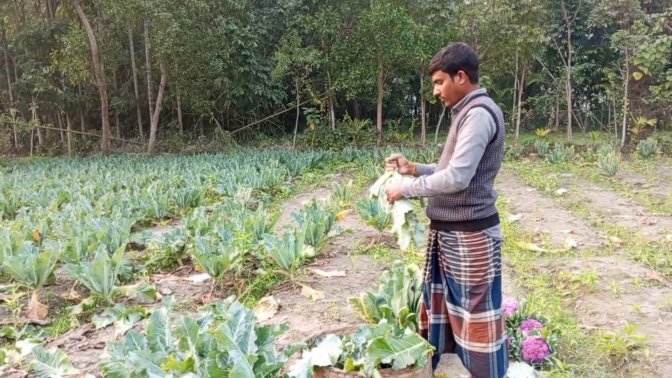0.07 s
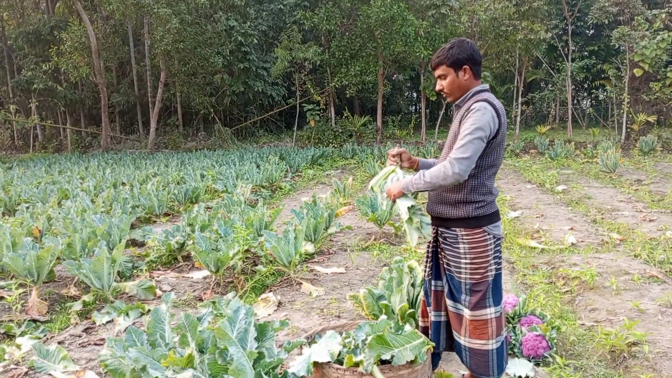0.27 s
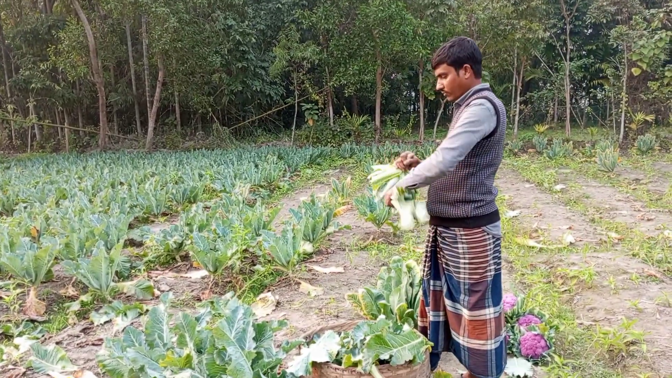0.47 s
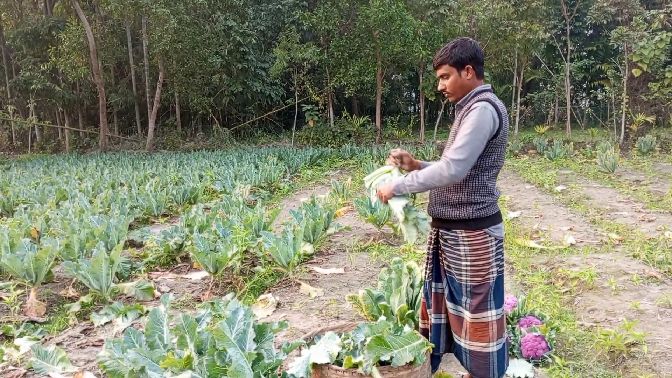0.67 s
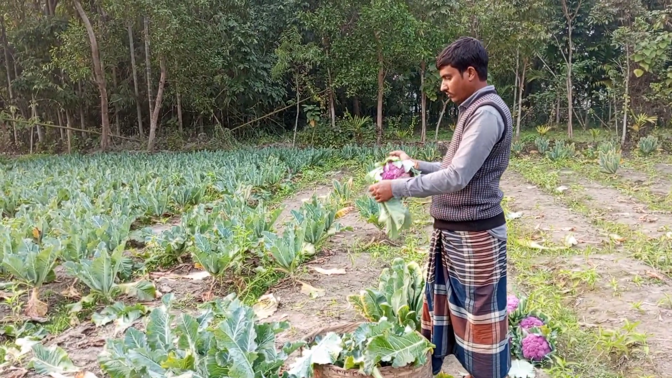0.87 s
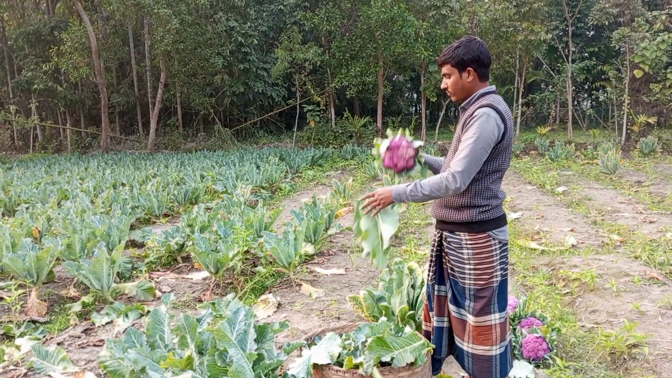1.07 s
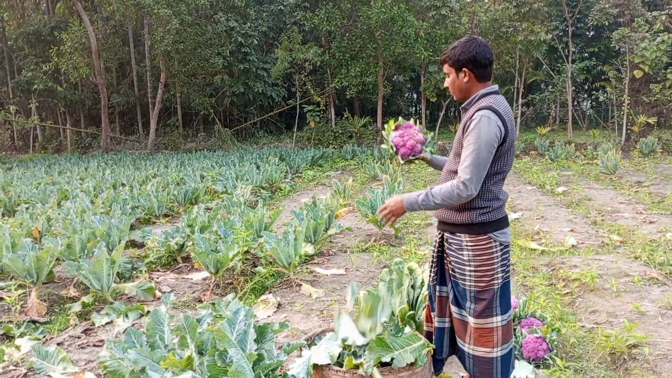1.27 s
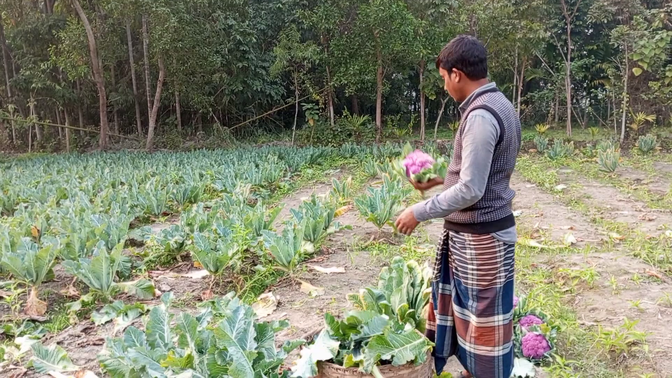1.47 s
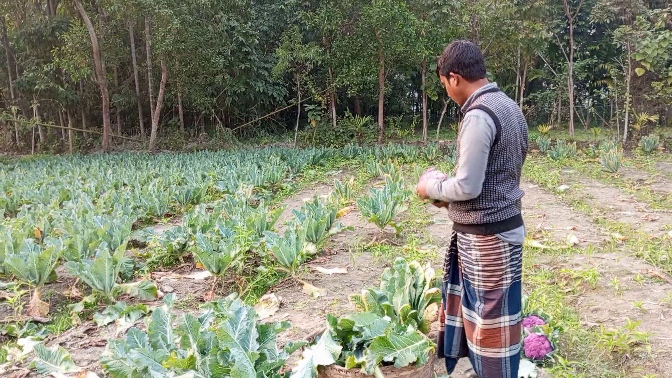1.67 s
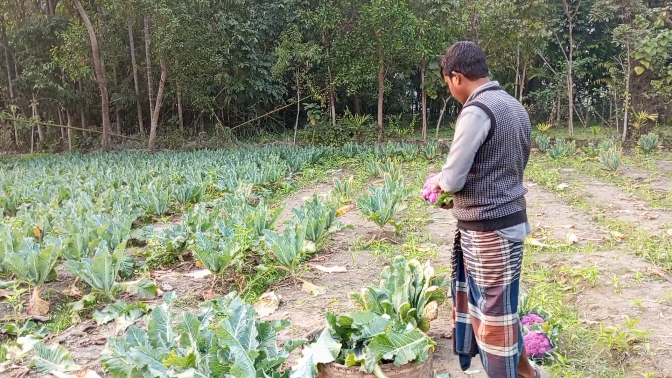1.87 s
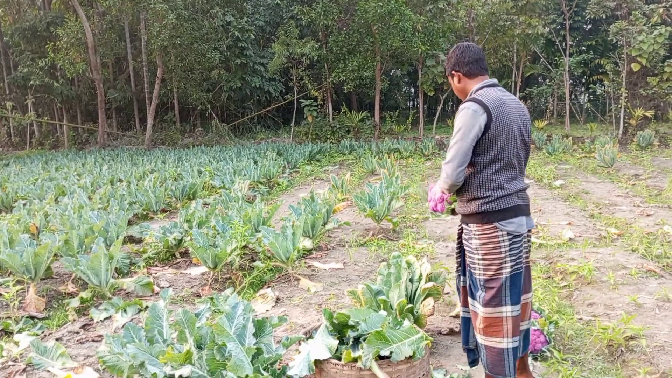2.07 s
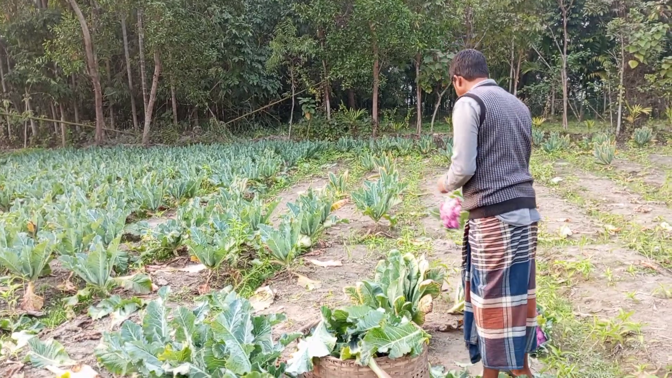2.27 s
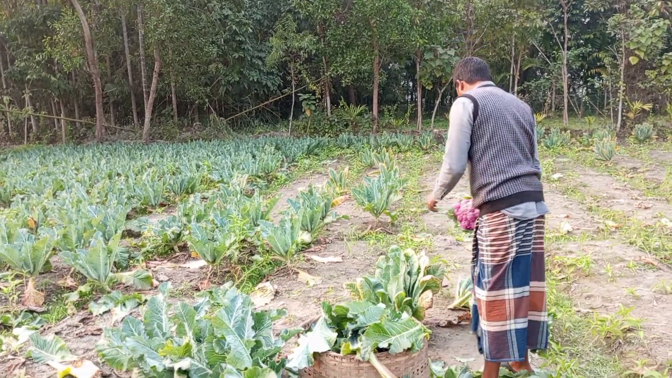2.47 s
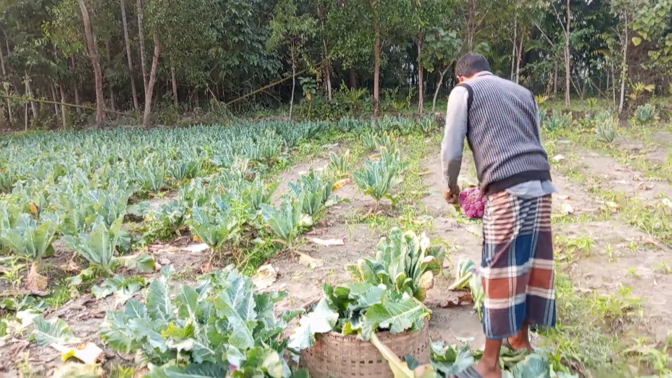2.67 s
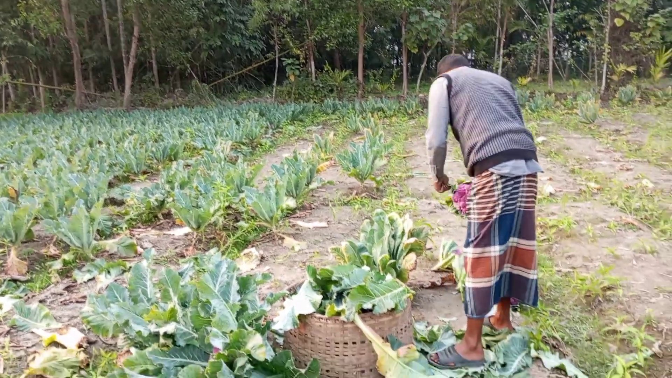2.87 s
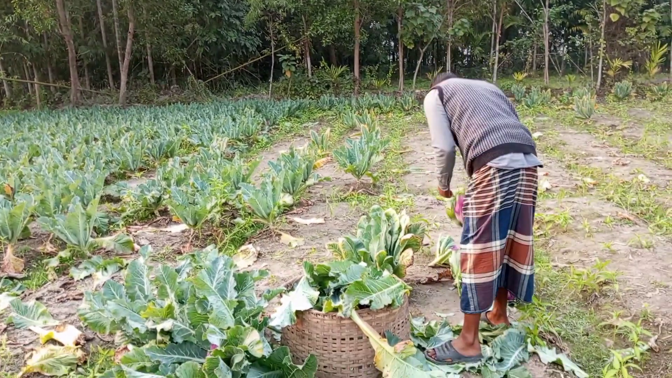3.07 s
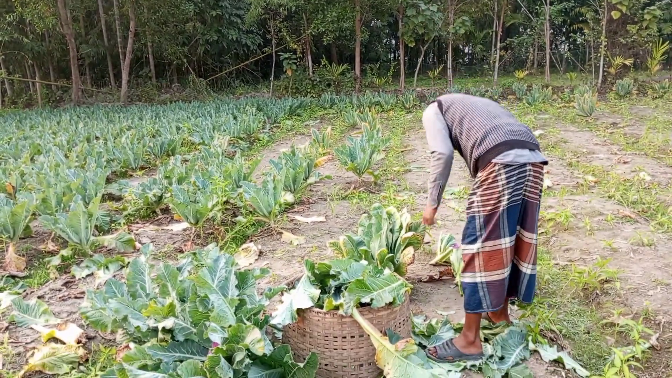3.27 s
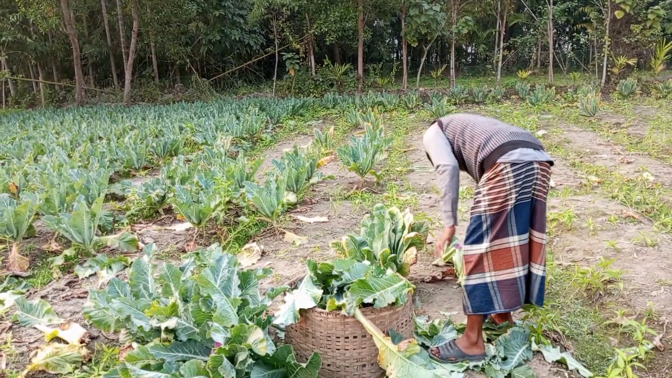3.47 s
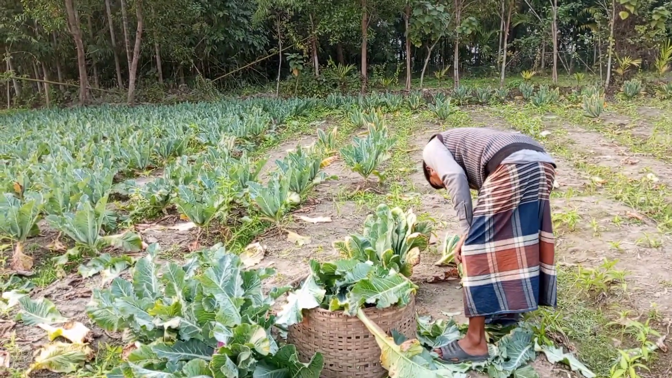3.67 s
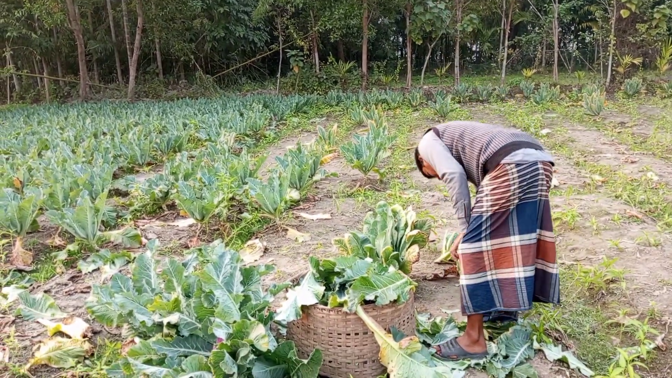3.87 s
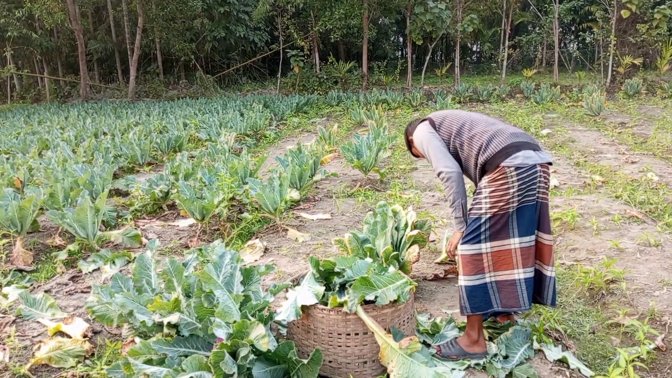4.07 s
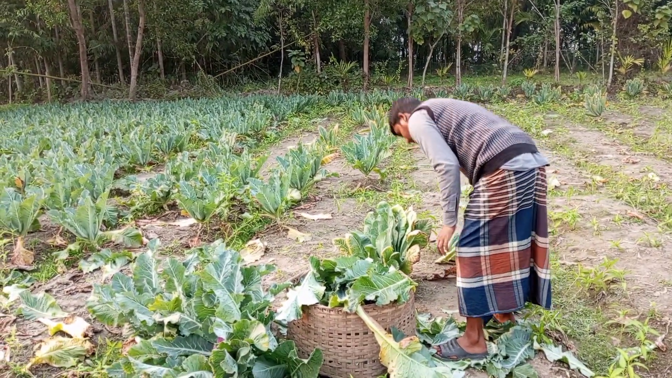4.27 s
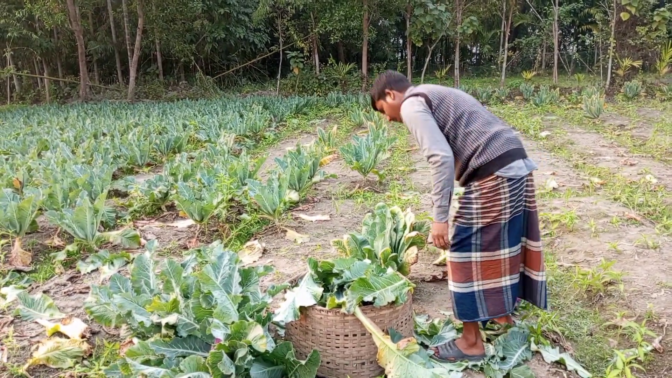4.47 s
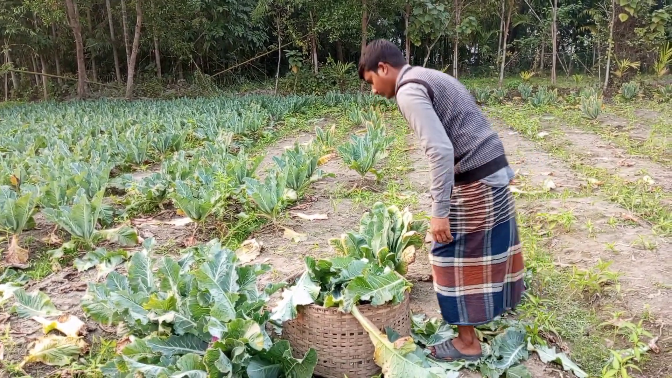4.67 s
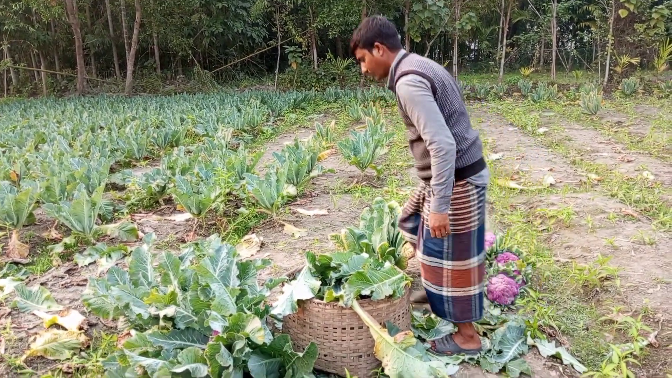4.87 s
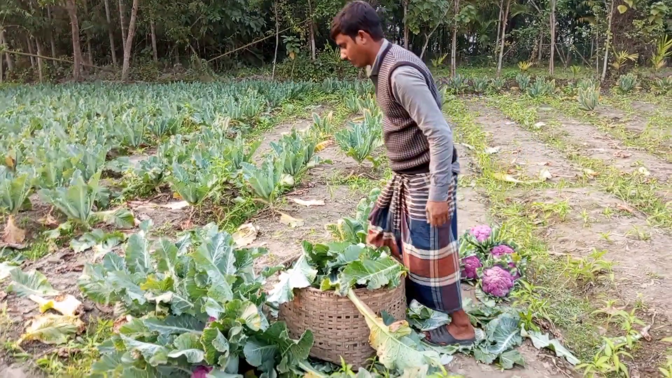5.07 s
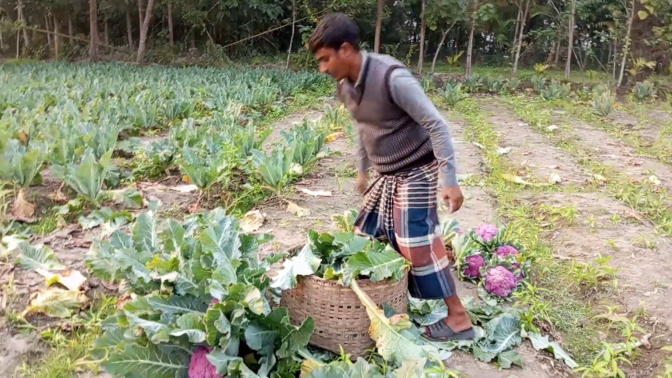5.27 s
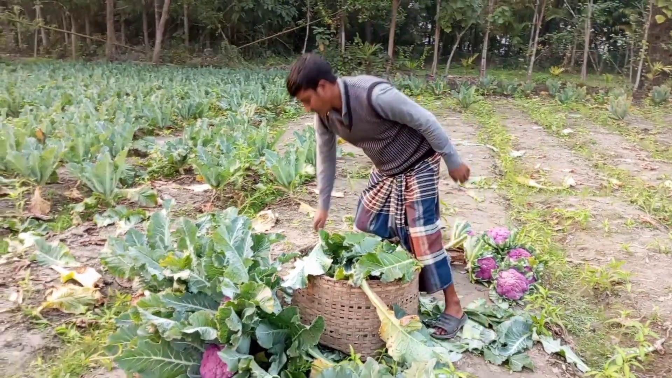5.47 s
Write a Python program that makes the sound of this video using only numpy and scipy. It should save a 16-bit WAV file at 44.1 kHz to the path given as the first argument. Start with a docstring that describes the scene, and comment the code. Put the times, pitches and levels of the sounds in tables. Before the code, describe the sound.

Close by, thick cauliflower leaves are snapped off by hand: dry cracks, two soft low pops and crackling rustle, strongest in the first half second. Handling then thins to small ticks and scuffs. A songbird's thin gliding whistle sounds early and returns halfway, with soft hoots far off in the trees. Near the end a foot crushes a crisp stalk. Open field beside a wood, light echo, faint hiss and low rumble.

```python
"""At the edge of a wood, hands snap leaves off a cauliflower: clicks of breaking fibres ring the stalk.
The leaves fold with two sagging pops and rustle as colored crackle; soles and leaves scuff in ringing grains.
A songbird's gliding whistle, heard early, returns halfway; far birds hoot on and off throughout.
Towards the end a sole crushes a crisp stalk. Field hiss and low rumble, both filtered noise, never stop."""
import sys
import numpy as np
from scipy import signal
from scipy.fft import rfft, irfft
from scipy.io import wavfile
from scipy.ndimage import uniform_filter1d

SR = 44100
rng = np.random.default_rng(int(sys.argv[2]) if len(sys.argv) > 2 else 0)


def master(y):
    """Save y as 16-bit WAV."""
    cut = np.clip(np.atleast_2d(y).T, -1, 1)
    pcm = np.round(cut * 32767)  # scale
    wavfile.write(sys.argv[1], SR, pcm.astype(np.int16))


N = 242991


def undb(db):
    """Decibels to gain."""
    return 10 ** (np.asarray(db) / 20)


def unit(x):
    """Scale to rms 1."""
    return x / np.sqrt(np.mean(x ** 2) + 1e-30)


def colour(x, points):
    """Shape a sound by (Hz, dB) points, joined over log frequency; rms 1."""
    hz, db = np.transpose(points)
    f = np.maximum(np.fft.rfftfreq(len(x), 1 / SR), 1)
    gain = undb(np.interp(np.log(f), np.log(hz), db))
    return unit(irfft(rfft(x) * gain, len(x)))


def band(x, lo_hz, hi_hz, order=3):
    """Causal band-pass."""
    edges_hz = [lo_hz, min(hi_hz, SR / 2 - 1)]
    return signal.sosfilt(signal.butter(order, edges_hz, "band", fs=SR, output="sos"), x)


def resonance(x, hz, width_hz):
    """One resonance, gain 1 at its centre."""
    return signal.lfilter(*signal.iirpeak(hz, hz / width_hz, SR), x)


def walk(rate_hz):
    """Smooth random wander, rms 1."""
    k = max(int(SR / rate_hz), 1)
    steps = np.repeat(rng.standard_normal(N // k + 1), k)
    return unit(uniform_filter1d(steps, k)[:N])


def add(out, s, x):
    """Mix a short sound in at s seconds."""
    i = max(int(s * SR), 0)
    out[i:i + len(x)] += x[:max(N - i, 0)]


def swells(rows, rest_db):
    """Joint gain of swells (peak s, rise s, fall s, dB) over a resting level; powers add."""
    shape = 1.31  # 1 is a pointed swell, 2 a rounded one
    power = np.full(N, undb(rest_db) ** 2)
    for s, rise_s, fall_s, db in rows:
        t = np.arange(N) / SR - s
        away = np.maximum(-t / rise_s, t / fall_s)
        near = away < 10
        power[near] += (undb(db) * np.exp(-away[near] ** shape)) ** 2
    return np.sqrt(power)


def fade(t, attack_s, release_s):
    """Attack, hold and release over the times t."""
    return np.clip(np.minimum((t - t[0]) / attack_s, (t[-1] - t) / release_s), 0, 1)


def whistle(hz, second_db, third_db):
    """A nearly pure tone on a moving pitch, with traces of two overtones."""
    phase = 2 * np.pi * np.cumsum(hz) / SR
    overtones = undb(second_db) * np.sin(2 * phase) + undb(third_db) * np.sin(3 * phase)
    return np.sqrt(2) * (np.sin(phase) + overtones)


def fibres(n, rate, spread_db):
    """Random clicks (rate per second): many small fibres give way, and a few large ones."""
    chance, out = rng.random(n), np.zeros(n)
    hits = np.flatnonzero(chance < rate / SR)
    size = -np.log(chance[hits] * SR / rate + 1e-9)
    out[hits] = (-1.) ** hits * undb(spread_db * np.minimum(size, 4))
    return out


def crackle(rate, spread_db, relative_width):
    """Creases of many sizes buckle, each size ticking at its own pitch."""
    out = 0
    for hz in np.geomspace(170, 15000, 44):
        out = out + resonance(fibres(N, rate, spread_db), hz, relative_width * hz)
    return unit(out)


def trees(x, t60_s, wet_db):
    """The sound plus its diffuse echo from the trunks: decaying noise with a soft onset."""
    t = np.arange(SR) / SR
    echo = rng.standard_normal(SR) * np.exp(-np.log(1000) * t / t60_s) * (1 - np.exp(-t / 0.011))
    return x + undb(wet_db) * signal.fftconvolve(x, echo / np.linalg.norm(echo))[:N]


def field():
    """Open field: faint hiss and a wandering low rumble, both coloured noise."""
    # Each row: frequency in Hz, relative level in dB per Hz.
    air_spectrum = [(30, -19.5), (90, 7), (230, 0.5), (450, -7), (1100, -9.5), (1700, -4.5), (2400, -6),
                    (3300, -12), (4700, -21.5), (6200, -7), (7200, 1.5), (8300, -10), (10000, -29.5),
                    (16000, -29.5)]
    # Each row: frequency in Hz, relative level in dB per Hz.
    rumble_spectrum = [(20, -32.5), (45, -5), (65, -5.5), (86, 2), (115, -7), (180, -22), (400, -53.5)]
    # Low swells. Each row: peak in seconds, rise in seconds, fall in seconds, level in dB before trim.
    rumble_rows = [(.02, .1, .25, -69), (.51, 0.2, 0.048, -65.5), (.79, .08, 0.14, -59.5),
                   (1.22, 0.17, 0.061, -70.5), (1.7, 0.22, .2, -76.5), (2.48, 0.37, 0.12, -63),
                   (3.8, 0.22, 0.097, -74), (5.222, 0.017, 0.028, -58), (5.51, .05, .05, -74.5)]
    rumble_trim_db, rumble_rest_db = -1, -87.5  # rest is before trim
    air = colour(rng.standard_normal(N), air_spectrum) * undb(-73.5 + .4 * walk(6))
    rumble = colour(rng.standard_normal(N), rumble_spectrum) * swells(rumble_rows, rumble_rest_db)
    return air + rumble * undb(rumble_trim_db)


def far_birds():
    """Soft hoots from deep in the wood, smeared by the trunks, and a narrow noise band of farther calls."""
    # Each row: start in seconds, length in seconds, pitch in Hz, glide from end to end in Hz,
    # sag in the middle in Hz, level in dB before trim and flutter.
    hoot_rows = [(0.084, .29, 627, 40, -91, -68), (0.103, 0.17, 1019, 0, 16, -66.5),
                 (0.513, .11, 600, -3, -1, -76), (0.73, 0.18, 1330, -63, 21, -69),
                 (1.398, .15, 980, -49, 74, -64.5), (2.21, 0.14, 511, 10, 8, -70),
                 (2.857, .11, 622, 11, 3, -78.5), (2.943, 0.12, 955, -58, 69.5, -70.5),
                 (3.597, 0.066, 954, 32.5, -5, -54.5), (3.654, 0.11, 1004, -56.5, -6, -68),
                 (3.731, .19, 588, -63.5, -13.5, -71.5), (4.735, .1, 600, -24, 9, -73.5),
                 (4.909, 0.035, 990, -50, -4, -53.5), (4.941, 0.11, 962, 14, 24.5, -57.5),
                 (5.448, .12, 603, -12, -12, -65)]
    # Blurred calls. Each row: middle in seconds, half length in seconds, level in dB.
    call_rows = [(.14, 0.14, -71), (.93, 0.094, -66.5), (1.191, 0.029, -66), (1.52, 0.065, -71),
                 (1.94, 0.47, -73), (2.38, 0.083, -83), (3.016, 0.078, -75), (3.375, 0.092, -70),
                 (3.68, 0.048, -70), (3.981, 0.077, -74), (4.364, 0.03, -71.5), (4.918, 0.053, -72)]
    trim_db, flutter_db, waver_hz = -2, 4.5, 16
    hoots, waver = np.zeros(N), waver_hz * walk(110)
    for s, length_s, hz, glide_hz, sag_hz, level_db in hoot_rows:
        i = np.arange(int(s * SR), min(int((s + length_s) * SR), N))
        along = np.linspace(-1, 1, len(i))
        pitch = hz + glide_hz * along / 2 - sag_hz * (1 - along ** 2) + waver[i]
        hoot = whistle(pitch, second_db=-39.5, third_db=-27) * undb(level_db)
        hoots[i] += hoot * fade(i / SR, attack_s=0.022, release_s=0.018)
    hoots = hoots * undb(trim_db + flutter_db * walk(70))
    t = np.arange(N) / SR
    calls = sum(undb(db) * np.exp(-((t - s) / half_s) ** 2) for s, half_s, db in call_rows)
    chorus = unit(band(rng.standard_normal(N), 2254, 2480, order=2)) * calls
    return trees(hoots, t60_s=0.3, wet_db=-12.0) + chorus


def songbird():
    """A gliding whistle, trilled most deeply at its top; foliage scatters it and makes it flutter."""
    # Each row: swell peak in seconds, level there in dB before the ring boost, swell from its ends in dB,
    # turns of the pitch as (seconds, Hz).
    note_rows = [(.275, -59.5, 3.3, [(.135, 3660), (.24, 3803), (.332, 3520)]),
                 (.416, -43.5, 8.1, [(.403, 3354), (.435, 2820), (.458, 2720)]),
                 (.505, -51, 17.6, [(.475, 2900), (.535, 3005), (.6, 2900)]), (.657, -58, 19, [(.625, 3940),
                 (.655, 3700), (.69, 3880)]), (.692, -47.5, 11, [(.666, 3030), (.692, 3064), (.742, 3010)]),
                 (.785, -53, 11, [(.762, 2910), (.785, 2794), (.818, 2720)]), (2.61, -53, 5, [(2.505, 4560),
                 (2.555, 4640), (2.6, 5284), (2.67, 5080)]), (2.79, -54, 4.5, [(2.738, 5130), (2.795, 5000),
                 (2.812, 4575), (2.862, 4500)]), (2.981, -51.5, 14, [(2.943, 6150), (2.978, 5090),
                 (2.992, 4120), (3.006, 3050)]), (3.536, -46.5, 4.2, [(3.22, 4520), (3.29, 4750),
                 (3.42, 5370), (3.495, 5090), (3.513, 3990), (3.535, 3650), (3.556, 3380), (3.578, 2970)]),
                 (3.99, -43, 9, [(3.861, 4480), (3.92, 4320), (3.99, 4347), (4.085, 4260), (4.125, 3936),
                 (4.162, 3636), (4.214, 3473)]), (4.4, -55, 1.5, [(4.37, 3560), (4.475, 3966), (4.53, 4000),
                 (4.551, 3590), (4.57, 2620)]), (4.776, -49.5, 4.7, [(4.682, 3303), (4.753, 3200),
                 (4.766, 3490), (4.795, 3545), (4.824, 3210)]), (4.99, -49, 15.4, [(4.928, 2800),
                 (4.96, 2734), (5.008, 2960)]), (5.035, -50.5, 5.6, [(4.995, 3456), (5.032, 3592),
                 (5.064, 3070)]), (5.176, -48, 14, [(5.146, 3450), (5.16, 3200), (5.183, 2930)]),
                 (5.257, -42, 5.3, [(5.235, 3090), (5.257, 3256), (5.279, 2960)]),
                 (5.44, -52.5, 12, [(5.428, 2930), (5.465, 2690)])]
    # Each row: pitch in Hz, trill depth in Hz, share scattered by foliage in dB.
    buzz_rows = [(3015, 10, -10.5), (4330, 7.3, -11), (4630, 20, -7), (5290, 147, -5.5)]
    ring_hz, ring_width_hz, ring_db = 3524, 490, 10.5  # louder as it glides through this pitch
    song, scattered = np.zeros(N), np.zeros(N)
    trill_hz = 135 + 28 * walk(60)
    trill = np.sin(2 * np.pi * np.cumsum(trill_hz) / SR)
    waver_hz, flutter_db = 14 * walk(150), 0.2 * walk(90)
    buzz_hz, depth_hz, scatter_db = np.transpose(buzz_rows)
    for peak_s, level_db, swell_db, turns in note_rows:
        s, turn_hz = np.transpose(turns)
        i = np.arange(int(s[0] * SR), int(s[-1] * SR))
        hz = np.interp(i / SR, s, turn_hz)
        loud_db = level_db - swell_db * np.interp(i / SR, [s[0], peak_s, s[-1]], [1, 0, 1])
        loud_db = loud_db + ring_db * np.exp(-((hz - ring_hz) / ring_width_hz) ** 2)
        pitch = hz + waver_hz[i] + trill[i] * np.interp(hz, buzz_hz, depth_hz)
        note = whistle(pitch, second_db=-56, third_db=-56.5)
        # a note that begins by rising swells in slowly
        attack_s = 0.023 if turn_hz[1] > turn_hz[0] else 0.0071
        note = note * undb(loud_db + flutter_db[i]) * fade(i / SR, attack_s, release_s=.006)
        song[i] += note
        scattered[i] += note * undb(np.interp(hz, buzz_hz, scatter_db))
    t = np.arange(SR // 10) / SR
    foliage = rng.standard_normal(len(t)) * np.exp(-t / 0.019)
    song = song + signal.fftconvolve(scattered, foliage / np.linalg.norm(foliage))[:N]
    return trees(song, t60_s=0.48, wet_db=-19.0)


def rustle():
    """Leaves crackle and tick, swelling unevenly with each stroke; hard crushing is brighter."""
    # Strokes of hands, cloth and feet. Each row: peak in seconds, rise in seconds, fall in seconds,
    # level in dB before part trims, flapping in dB re level, hiss in dB re level.
    stroke_rows = [(0.044, 0.025, 0.043, -61.5, 6, -1), (.19, 0.23, 0.3, -58, -7, -1.5),
                   (0.404, 0.024, 0.031, -43, -28, -9), (.487, 0.021, 0.026, -39, -18, -5),
                   (.735, 0.057, 0.11, -56, -7.5, -9.5), (.805, 0.012, 0.02, -58.5, 2, -18),
                   (.86, .03, 0.029, -63.5, -22, -3), (1.0, 0.071, 0.11, -57, -18, -3),
                   (1.335, 0.11, 0.038, -58.5, -2.5, -6.5), (1.4, 0.032, 0.038, -67.5, 14.5, -6),
                   (1.8, 0.26, 0.1, -70.5, -3.5, 4), (1.97, 0.11, 0.044, -72.5, 3, 4.5),
                   (2.13, 0.12, 0.05, -69.5, 1.5, -2), (2.21, 0.027, 0.04, -69, 7.5, 7),
                   (2.45, 0.05, 0.066, -65, -5, -0.5), (2.655, 0.032, 0.13, -66, -6, -1),
                   (2.83, 0.069, 0.036, -64.5, -8, -4), (3.36, 0.12, 0.086, -74, 1, 7),
                   (3.8, 0.51, 0.23, -88, 21.5, -19), (4.231, 0.12, 0.094, -70, -0.5, 4.5),
                   (4.451, 0.094, 0.16, -64.5, -2, 1), (4.61, 0.018, 0.016, -59.5, -20, 4.5),
                   (4.92, 0.27, 0.22, -68.5, -4.5, 2.5), (5.135, 0.014, 0.02, -69.5, -11, 15),
                   (5.184, .012, 0.0034, -57.5, -6, 18), (5.245, 0.011, 0.027, -52.5, 4.5, 6.5),
                   (5.361, 0.11, 0.042, -46.5, -14, -2.5), (5.46, 0.09, 0.07, -59.5, -6, -0.5)]
    # Spectra of the parts. Each row: frequency in Hz, relative level in dB per Hz.
    crinkle_spectrum = [(600, -34.5), (1200, -1), (1700, -1.5), (2400, 5), (3300, 5.5), (4400, -11.5),
                        (6000, -10.5), (9000, -48)]
    flap_spectrum = [(60, -30.5), (180, 0.5), (500, -1), (900, -0.5), (1400, -7), (2500, -3.5), (4700, -11),
                     (6500, -16), (10000, -41.5)]
    hiss_spectrum = [(3000, -28), (4800, -24.5), (6000, 1.5), (7100, 5.5), (8000, -5.5), (9200, -19),
                     (11000, -34), (13500, -27.5), (15000, -21.5), (16500, -34.5)]
    sparkle_spectrum = [(7000, -25.5), (9000, -10.5), (11000, -19), (13500, -7.5), (15000, 2), (16500, -15)]
    stir_db, flap_rest_db = -80.5, -76  # before trims: the leaves never lie quite still
    grip = undb(1.7 * walk(90))
    s, rise_s, fall_s, db, more_flap_db, more_hiss_db = np.transpose(stroke_rows)
    crinkle = swells(zip(s, rise_s, fall_s, db), stir_db)
    flap = swells(zip(s, rise_s, fall_s, db + more_flap_db), flap_rest_db)
    hiss = swells(zip(s, rise_s, fall_s, db + more_hiss_db), stir_db)
    parts = [(crinkle_spectrum, crinkle * undb(-1.5)),
             (flap_spectrum, flap * undb(-6)),
             (hiss_spectrum, hiss),
             (sparkle_spectrum, hiss ** 1.5 * undb(7))]  # sparkle outgrows the hiss
    out = 0
    for spectrum, gain in parts:
        ticks = unit(fibres(N, rate=1800, spread_db=2.5))
        grains = crackle(rate=170, spread_db=3.8, relative_width=.055) + .7 * ticks
        out = out + colour(grains * grip, spectrum) * gain
    return out


def scuffs():
    """Leaves wrenched or landing, soles on soil and litter: ringing grains; high ones die sooner."""
    # Each row: middle in seconds, half length in seconds, centre in Hz, width in Hz, level in dB before gain.
    scuff_rows = [(0.266, 0.0045, 873, 218, -40.5), (0.384, 0.0049, 880, 160, -36.5),
                  (0.474, .008, 324, 60, -46.5), (0.741, 0.034, 5580, 1280, -50.5),
                  (0.751, 0.039, 2200, 500, -64), (0.794, 0.029, 1216, 406, -53.5),
                  (0.812, 0.018, 900, 396, -60.5), (1.334, 0.041, 1130, 490, -55),
                  (1.364, 0.033, 4630, 870, -56.5), (1.381, 0.026, 550, 242, -53.5),
                  (1.431, 0.028, 264, 160, -57), (2.129, 0.028, 1600, 498, -62),
                  (2.196, 0.016, 724, 497, -60.5), (2.437, 0.032, 4900, 790, -67.5),
                  (2.453, 0.025, 3520, 298, -56), (2.641, 0.0035, 400, 69, -46),
                  (3.042, .003, 1840, 250, -45.5), (3.809, 0.028, 422, 250, -71),
                  (4.419, 0.017, 654, 139, -69.5), (4.6, 0.013, 1560, 300, -66),
                  (5.208, 0.0079, 285, 260, -54), (5.376, 0.025, 860, 296, -61.5)]
    gain_db, spread_db = 7, 4
    grains_per_s, max_ring_s, max_cycles = 2000, 0.005, 5.1  # rate is per second of half length
    out, t = np.zeros(N), np.arange(SR // 40) / SR
    for s, half_s, hz, width_hz, db in scuff_rows:
        count = int(np.clip(grains_per_s * half_s, 16, 120))
        when, pitch, size = rng.standard_normal(size=(120, 3))[:count].T
        ring_s = min(max_ring_s, max_cycles / hz)
        # the grains share the energy of the whole swell
        share = np.sqrt(half_s / ring_s / count)
        sizes = unit(undb(spread_db * size)) * undb(db + gain_db) * share
        for delay_s, detune_hz, gain in zip(when * half_s / 2, pitch * width_hz / 2, sizes):
            tone = np.sin(2 * np.pi * (hz + detune_hz) * t)
            grain = tone * np.exp(-t / ring_s) * (1 - np.exp(-t * hz))
            add(out, s + delay_s, gain * grain)
    return out


def pops():
    """Leaves fold against the head: a pocket of air rings briefly while its pitch sags."""
    # Each row: start in seconds, first pitch in Hz, last pitch in Hz, peak in dB, swell time in seconds.
    pop_rows = [(0.1533, 267, 176.6, -34, 0.0026), (0.1862, 470, 118.3, -27, 0.0011)]
    sag_s = 0.0023
    out, t = np.zeros(N), np.arange(SR // 20) / SR
    for s, first_hz, last_hz, db, swell_s in pop_rows:
        hz = last_hz + (first_hz - last_hz) * np.exp(-t / sag_s)
        phase = 2 * np.pi * np.cumsum(hz) / SR
        envelope = t / swell_s * np.exp(1 - t / swell_s)
        add(out, s, undb(db) * np.sin(phase) * envelope)
    return out


def breaking(rows, tone):
    """A first crack, a run of breaking fibres, then stragglers that crackle away; all ring the stalk."""
    # Stalk resonances. Each row: frequency in Hz, width in Hz, gain in dB.
    mode_rows = [(310, 230, -18), (980, 610, -3), (1673, 90, -1.5), (2332, 270, 4.5), (2870, 730, 3),
                 (3630, 190, 2), (5300, 1340, -6.5), (7290, 680, 16), (7080, 700, -12), (15540, 4400, 4)]
    # Body, crack, edge, sizzle and air. Each row: low edge in Hz, high edge in Hz.
    tone_bands = [(220, 1300), (1400, 3900), (4100, 5800), (5900, 8700), (10000, 16000)]
    first_db, release_s = 12, 0.0017
    tail_db, tail_s = -17, 0.012
    blade_db, blade_s = -5, 0.00114
    ring_db, ring_width_hz = 9, 380
    out, t = np.zeros(N), np.arange(SR // 10) / SR
    edge_db, air_db = tone
    for s, tear_s, hz, level_db, body_db, bright_db in rows:
        run = fibres(len(t), rate=6000, spread_db=1.5) * np.exp(-np.maximum(t - tear_s, 0) / release_s)
        run[0] = undb(first_db)
        stragglers = fibres(len(t), rate=4000, spread_db=7.5)
        run += undb(tail_db) * stragglers * np.exp(-t / tail_s)
        # each break spreads through the leaf blade for about a millisecond
        blade = rng.standard_normal(len(t)) * np.exp(-t / blade_s)
        spread = signal.fftconvolve(run, blade / np.linalg.norm(blade))[:len(t)]
        run = run + undb(blade_db) * spread
        ring = sum(undb(db) * resonance(run, mode_hz, width_hz) for mode_hz, width_hz, db in mode_rows)
        ring = ring + undb(ring_db) * resonance(ring, hz, ring_width_hz)
        # the soil's reflection cancels the sound near 500 Hz
        ring = ring - resonance(ring, hz=537, width_hz=470)
        # brightness tilts everything above the crack
        shape_db = (body_db, 0, bright_db / 2 + edge_db, bright_db, bright_db + air_db)
        for (lo_hz, hi_hz), db in zip(tone_bands, shape_db):
            part = band(ring, lo_hz, hi_hz)
            add(out, s, part * undb(level_db + db) / np.std(part[t < tear_s + .001]))
    return out


def crushed_stalks():
    """Crisp stalks crushed under a sole: fibres break in runs of clicks."""
    # Each row: start in seconds, tearing time in seconds, ring in Hz, level in dB, body in dB re level,
    # brightness in dB re level.
    crush_rows = [(4.604, .0016, 3280, -46, -19, -18), (4.61, 0.0069, 2420, -51, -8.5, -0.5),
                  (5.109, 0.0093, 7300, -69, -27, 18.5), (5.174, 0.0019, 7060, -48.5, -29, 14.5),
                  (5.18, 0.0062, 3200, -45.5, -39, 5), (5.2036, 0.0053, 7080, -26.5, -8.5, 2.5),
                  (5.251, 0.0064, 2970, -36.5, -17, -21), (5.261, .0014, 3120, -48, -10, -3),
                  (5.286, .005, 6260, -49, -29, -1), (5.339, 0.0016, 6300, -51.5, -24, 13.5),
                  (5.358, 0.0018, 7060, -55, 0, 15), (5.364, 0.0024, 2900, -40.5, -11, -25),
                  (5.47, .0055, 7160, -53, -32, 12.5)]
    # Edge in dB re the mean of crack and sizzle, air in dB re sizzle.
    crush_tone = (-7.5, -15.5)
    return breaking(crush_rows, crush_tone)


def snapped_ribs():
    """Ribs snapped by hand and stems knocked about: fibres break in runs of clicks."""
    # Each row: start in seconds, tearing time in seconds, ring in Hz, level in dB, body in dB re level,
    # brightness in dB re level.
    snap_rows = [(.046, 0.0042, 3060, -59, -28, -24), (.094, 0.0036, 3660, -38.5, -39, -14),
                 (.156, 0.0057, 3700, -57.5, -13, 8), (.184, 0.002, 690, -56, 3, 0),
                 (.193, 0.0074, 3800, -48.5, -14, -5.5), (.265, 0.0043, 3700, -41.5, -17, -13),
                 (.29, 0.0028, 3620, -47, -6, -7), (.383, 0.0039, 910, -30.5, -13, -8),
                 (.396, .0024, 3500, -35.5, -23, -13), (.411, 0.0053, 3200, -40.5, -12, -5.5),
                 (.464, 0.004, 1810, -19.5, -12.5, -19), (.479, 0.0025, 1780, -38, -2.5, -4),
                 (.5, 0.0048, 3640, -42.5, -4, -6.5), (.52, 0.0018, 2930, -41.5, -6.5, -12),
                 (.691, 0.00074, 3070, -45, -11, -2.5), (.721, 0.0055, 6240, -47.5, -18, -7),
                 (.736, 0.003, 2150, -49.5, -23, -21), (1.056, 0.013, 6200, -55.5, -30, -1),
                 (1.077, 0.0054, 3300, -54, -33, -18), (1.364, 0.013, 4400, -53.5, -4.5, -15),
                 (1.38, 0.0083, 4420, -52, -12, -18), (1.412, 0.0027, 2140, -49, -9, -37),
                 (2.182, 0.0051, 2060, -57.5, -1.5, -6), (2.197, 0.0036, 5750, -56.5, 0, 1),
                 (2.643, 0.0038, 1310, -52.5, 2.5, -21), (2.806, 0.0093, 4320, -54.5, -24, -15),
                 (2.872, 0.0021, 3500, -52, -25, 0), (2.885, 0.011, 3600, -58.5, -22, -3.5),
                 (2.905, 0.0011, 3670, -57.5, -24, 0), (3.042, 0.0032, 3760, -46.5, -19, -2.5),
                 (4.458, 0.002, 3850, -63, 1, -3)]
    # Edge in dB re the mean of crack and sizzle, air in dB re sizzle.
    snap_tone = (-0.8, -18.5)
    return breaking(snap_rows, snap_tone)


def scene():
    """Leaves close by, birds behind, the field around."""
    close = rustle() + scuffs() + pops() + crushed_stalks() + snapped_ribs()
    leaves = trees(close, t60_s=0.65, wet_db=-27.5)
    return (field() + far_birds() + songbird() + leaves)[None]


def record(dry):
    """The recorder cuts the deepest bass and the top."""
    dry = signal.sosfilt(signal.butter(2, 55, "high", fs=SR, output="sos"), dry)
    return signal.sosfilt(signal.ellip(10, .2, 70, 15800, fs=SR, output="sos"), dry)


dry = scene()
out = record(dry)
master(out)
```